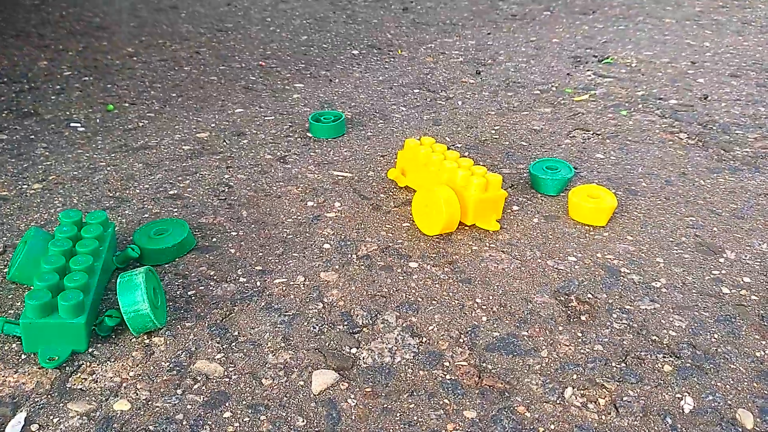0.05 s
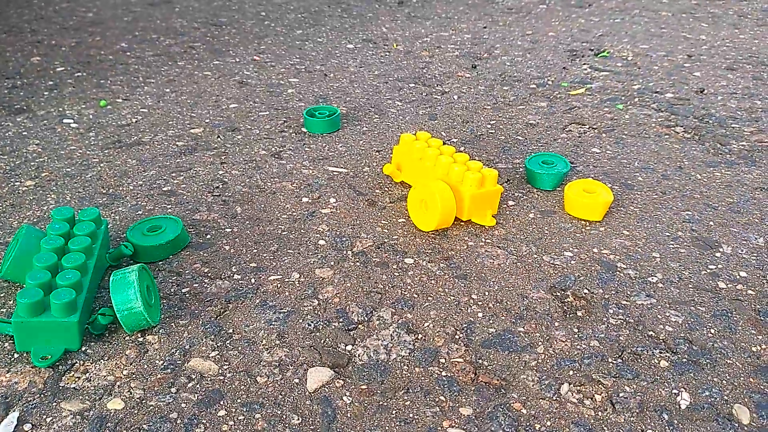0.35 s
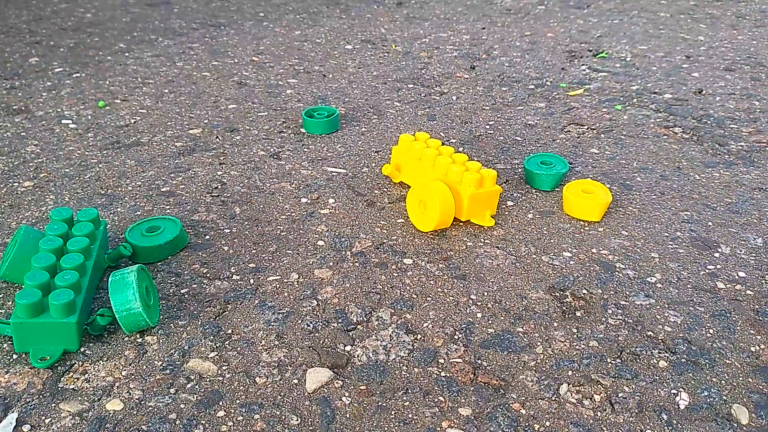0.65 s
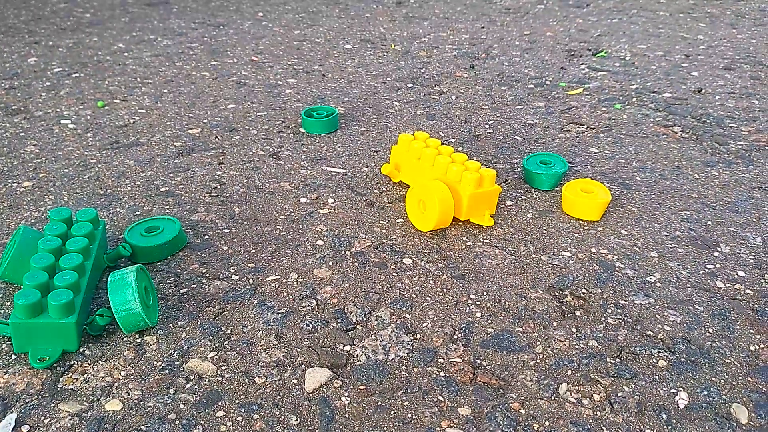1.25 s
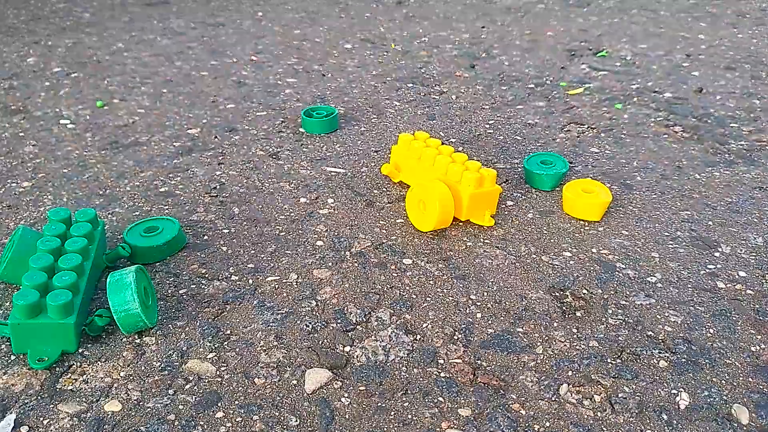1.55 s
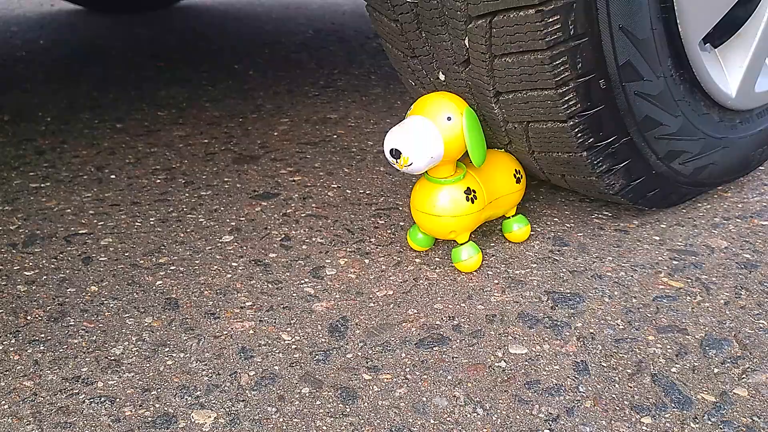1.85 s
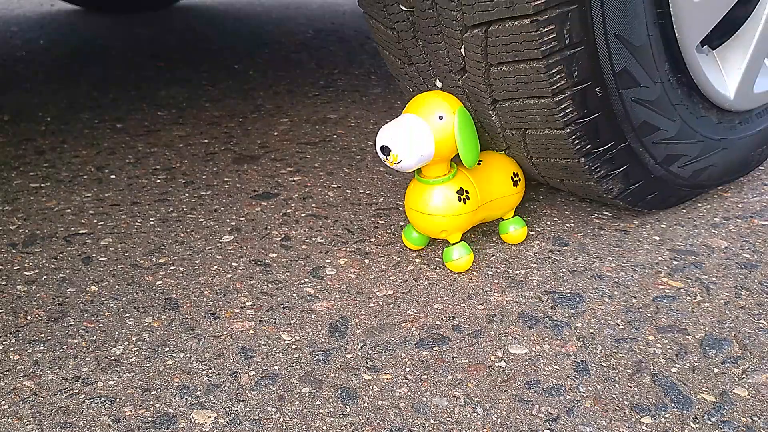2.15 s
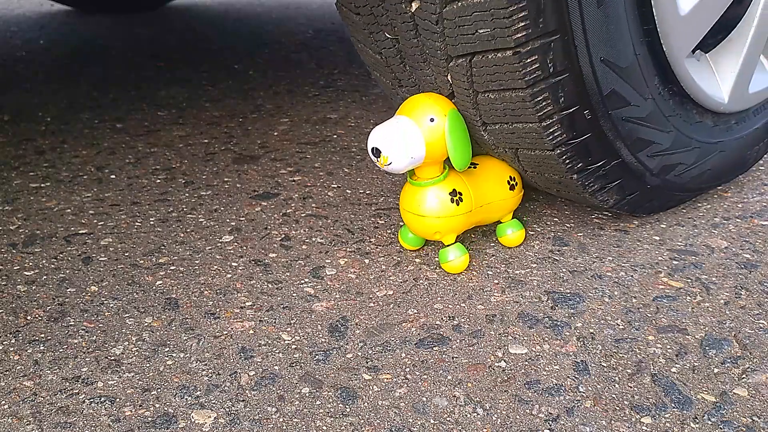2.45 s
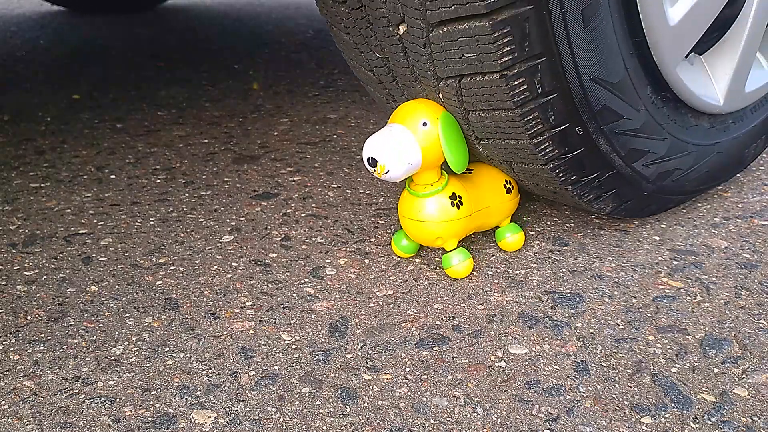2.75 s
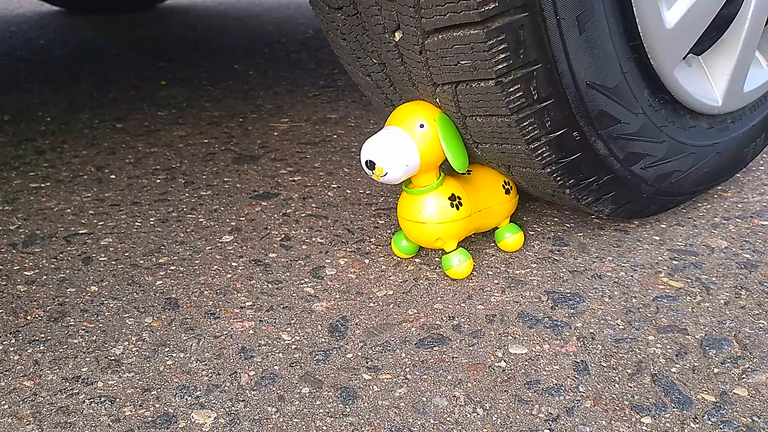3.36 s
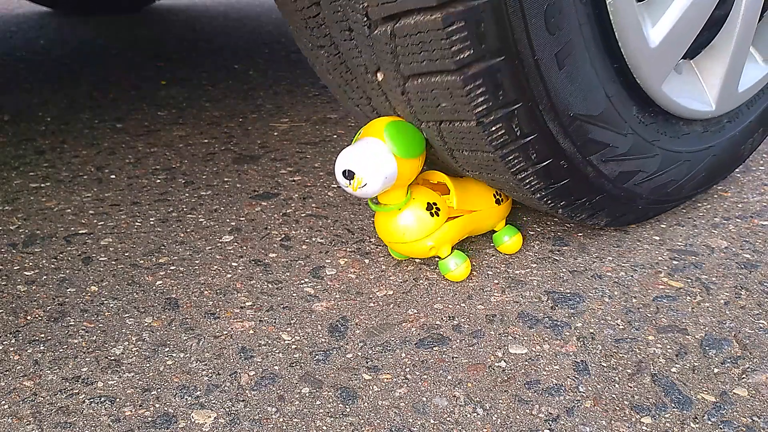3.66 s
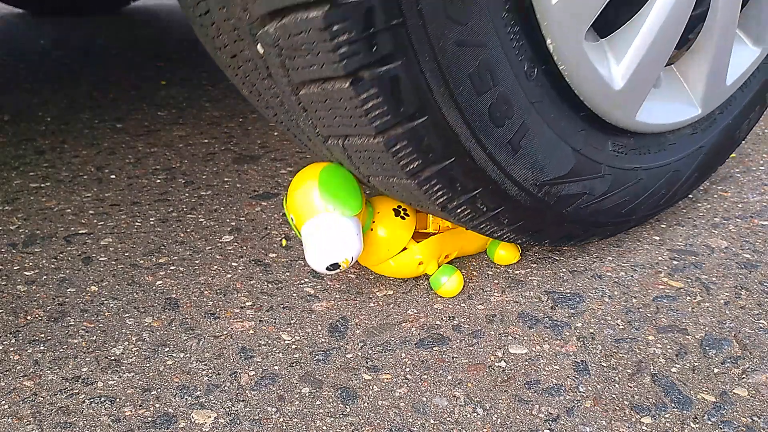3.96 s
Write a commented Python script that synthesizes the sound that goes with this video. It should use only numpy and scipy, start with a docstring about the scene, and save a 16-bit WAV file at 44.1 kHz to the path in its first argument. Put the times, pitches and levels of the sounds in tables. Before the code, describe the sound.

A plastic toy cracks and crunches under a car tyre on asphalt. The engine first idles a little way off, then close. Single sharp snaps come, then the engine revs and loud splintering with low thumps overloads the microphone.

```python
"""Car crushing a plastic toy

A car idles on asphalt, first a little way off, then close. It revs and its tyre climbs onto a
hollow plastic toy: single fractures snap, then runs of splintering crunch as the shell caves in.
The collapsing shell pushes air in low thumps; the loudest breaks overload the microphone."""
import sys
import numpy as np
from scipy import signal
from scipy.fft import rfft, irfft
from scipy.io import wavfile

SR = 44100
rng = np.random.default_rng(int(sys.argv[2]) if len(sys.argv) > 2 else 0)


def bounce(signal):
    """Save signal as a 16-bit WAV file at the path given by the first command-line argument."""
    frames = np.transpose(np.atleast_2d(signal))
    limited = np.clip(frames, -1, 1)
    pcm = np.round(limited * 32767).astype(np.int16)
    wavfile.write(sys.argv[1], SR, pcm)


N = 176400
CLOSE_S = 1.715  # the car is close from here on
SPLINTER_T60_S = 0.0053

# runs of splintering: t/s, length/s, rel. level/dB, rel. thump/dB, wall ring f/Hz, rel. ring/dB
CRUNCH_RUNS = [(2.5, 0.022, -9.5, -8.5, 1080, -13), (3.486, 0.026, -9, -16, 1520, -18),
               (3.5545, 0.023, -12.5, -6, 940, -5.5), (3.589, 0.0124, -13, -22, 1590, -6),
               (3.604, 0.019, -10, -9.5, 2270, -2), (3.629, 0.019, -16, -5.5, 650, -9.5),
               (3.690, 0.026, -19, -11, 930, -10), (3.709, 0.022, -10, -12.5, 2720, -14),
               (3.732, 0.028, -10.5, -14, 1008, -16), (3.804, 0.012, -17, -18, 1460, -11),
               (3.857, 0.024, -10, -12, 510, -8.5), (3.969, 0.015, -9.5, -2, 1480, -3),
               (3.987, 0.018, -11.5, -8, 1980, -4)]


def undb(db):
    """Decibels to amplitude."""
    return 10 ** (np.asarray(db) / 20)


def unit(x):
    """Scale to rms 1."""
    return x / np.sqrt(np.mean(x ** 2) + 1e-18)


def curve(rows, column=1):
    """One table column, linear in time between rows."""
    rows = np.array(rows)
    return np.interp(np.arange(N) / SR, rows[:, 0], rows[:, column])


def on_log(points, hz):
    """Read (f/Hz, value) points on a log-frequency axis."""
    points = np.array(points)
    return np.interp(np.log(hz + 1e-3), np.log(points[:, 0]), points[:, 1])


def colour(x, spectrum):
    """Minimum-phase filter of unit power, falling away below the spectrum's lowest point."""
    size = 2 ** 18
    hz = np.arange(size // 2 + 1) * SR / size
    low_cut = np.clip(hz / spectrum[0][0], 1e-2, 1) ** 3
    gain = unit(undb(on_log(spectrum, hz)) * low_cut)
    cepstrum = irfft(np.log(gain))
    cepstrum[1:size // 2] *= 2
    cepstrum[size // 2 + 1:] = 0
    return irfft(rfft(x, size) * np.exp(rfft(cepstrum)))[..., :x.shape[-1]]


def band(x, hz, width_hz):
    """A resonance applied twice."""
    b, a = signal.iirpeak(hz, hz / width_hz, fs=SR)
    return signal.lfilter(b, a, signal.lfilter(b, a, x))


def decay(t, t60_s):
    """Exponential fall of 60 dB in t60_s."""
    return np.exp(-np.log(1000) * t / t60_s)


def add(out, start_s, x):
    """Mix x into out from start_s."""
    i = int(start_s * SR)
    out[:, i:i + x.shape[-1]] += x[..., :max(N - i, 0)]


def uneven_sizes(count, spread_db=4.5):
    """Random amplitudes, many small and a few large."""
    return undb(spread_db * np.minimum(rng.exponential(size=count), 4))


def stereo_noise():
    """White noise, partly alike left and right in the bass."""
    # stereo likeness: f/Hz, left-right correlation
    likeness = [(20, 0.67), (120, 0.32), (300, 0.7), (600, 0.011), (15000, 0.034)]
    correlation = on_log(likeness, np.arange(N // 2 + 1) * SR / N)
    mid, side = rfft(rng.standard_normal((2, N)))
    spectrum = mid * np.sqrt(1 + correlation) + side * np.sqrt(1 - correlation) * np.array([[1], [-1]])
    return unit(irfft(spectrum, N))


def smear(x, t60_s):
    """Scattered reflections: each click becomes a noise tail of equal energy."""
    pole = decay(1 / SR, t60_s) ** 2
    power = signal.lfilter([1 - pole], [1, -pole], np.mean(x ** 2, axis=0) + 1e-18)
    return np.sqrt(power) * rng.standard_normal((2, N))


def under_car(x):
    """Direct sound, quick scatter between road, tyre and underbody, and a faint late echo."""
    return x + undb(-1) * smear(x, t60_s=0.092) + undb(-20.5) * smear(x, t60_s=0.38)


def engine_bay():
    """Hiss and hum of the engine bay with street noise, far and then near."""
    # noise spectra: f/Hz, rel. density/dB
    far_spectrum = [(100, 3), (200, -11.5), (320, -16.5), (520, -11), (700, -18), (950, -28), (1350, -25.5),
                    (1650, -21), (2100, -24.5), (3200, -32.5), (4300, -30.5), (7400, -38.5), (9700, -33.5),
                    (11000, -45.5), (15000, -70)]
    near_spectrum = [(100, -4.5), (170, -5), (300, -12.5), (520, -5), (760, -12), (1050, -19.5),
                     (1950, -15), (3300, -25), (4400, -24), (7000, -32.5), (8800, -28.5), (9800, -32),
                     (11000, -43.5), (15000, -52)]
    # noise envelopes: t/s, level/dB
    far_level = [(0, -38.5), (.45, -39), (.9, -42), (1.7, -41.5)]
    near_level = [(1.7, -36), (2.3, -37.5), (2.7, -36.5), (3.1, -37.5), (3.3, -33.5), (3.48, -27), (4, -22)]
    # bay hums: f/Hz, width/Hz, far level/dB, near level/dB
    hums = [(225.7, 17.6, -55, -49), (417.5, 29.6, -44, -45), (623.4, 48, -51.5, -41)]
    close = np.arange(N) / SR > CLOSE_S
    near = undb(curve(near_level)) * unit(colour(stereo_noise(), near_spectrum))
    far = undb(curve(far_level)) * unit(colour(stereo_noise(), far_spectrum))
    bay = np.where(close, near, far)
    for hz, width_hz, far_db, near_db in hums:
        bay += undb(np.where(close, near_db, far_db)) * unit(band(stereo_noise(), hz, width_hz))
    return bay


def engine():
    """Exhaust harmonics of the firing rate; the bay noise throbs with each firing."""
    # exhaust: t/s, firing rate/Hz, level/dB of harmonics 1, 2, 3, 4 before panning
    idle_far = [(0.0, 29, -20, -43, -45, -26.5), (0.022, 29.15, -23.5, -30.5, -52, -27),
                (0.476, 28.9, -25, -24.5, -58, -28.5), (0.556, 28.93, -26, -29.5, -44, -29),
                (1.68, 28.9, -28, -33, -51, -32)]
    idle_near = [(1.76, 29.02, -31, -24, -31, -28.5), (1.788, 29.2, -27.5, -28, -40, -26.5),
                 (2.3, 29.17, -23.5, -22.5, -40, -26.5)]
    revving = [(2.66, 29.67, -24.5, -24, -31.5, -27), (2.82, 29.73, -25.5, -26, -52, -26.5),
               (2.968, 31.74, -22, -33, -59, -36.5), (3.144, 34.11, -19, -24.5, -58, -45),
               (3.29, 39.1, -17.5, -28.5, -19, -44), (3.372, 47.15, -20, -28.5, -47, -39),
               (3.458, 54.8, -20.5, -26, -29, -57), (3.522, 58.9, -16.5, -24, -23, -43),
               (3.578, 61.53, -14, -25.5, -44, -47), (3.88, 69.24, -21.5, -30, -63, -51),
               (3.924, 69.8, -21, -47, -50, -36), (4.0, 70.8, -12, -30, -38, -26)]
    left_lag_s, harmonic_lag_rad, pan_db, throb_db = 0.00038, 0.7, 5, 1
    rows = [*idle_far, *idle_near, *revving]
    firing_hz = curve(rows)
    phase = 2 * np.pi * (np.cumsum(firing_hz) / SR - np.array([[left_lag_s], [0]]) * firing_hz)
    exhaust = np.zeros((2, N))
    for k in range(1, 5):
        peak = np.sqrt(2) * undb(curve(rows, column=k + 1))
        exhaust += peak * np.cos(k * phase - harmonic_lag_rad * (k - 1))
    pan = undb([[pan_db / 2], [-pan_db / 2]])
    return exhaust * pan + engine_bay() * undb(throb_db * np.cos(phase))


def tyre():
    """Rumble that grows as the wheel rolls over the toy."""
    # rumble envelope: t/s, level/dB
    level = [(0, -26.5), (.4, -34.5), (.6, -35), (1.65, -37), (1.8, -33), (3.25, -30.5), (3.4, -24),
             (3.55, -20), (3.76, -11), (3.9, -22.5), (4, -15)]
    # rumble spectrum: f/Hz, rel. density/dB
    spectrum = [(10, 9), (25, 4), (60, 6.5), (130, 0.5), (250, -22), (600, -48), (3000, -63), (12000, -75)]
    return undb(curve(level)) * unit(colour(stereo_noise(), spectrum))


def grit():
    """Grains of asphalt pop under the nearby tread."""
    # pop spectrum: f/Hz, rel. density/dB
    spectrum = [(400, -9), (1000, -1), (2000, -3), (4000, -19), (9000, -13), (11000, -43), (15000, -58)]
    pops_per_s, level_db = 60, -54.5
    hits = (rng.random(N) < pops_per_s / SR) & (np.arange(N) / SR > CLOSE_S)
    impulses = hits * uneven_sizes(N)
    pops = smear(impulses[None], SPLINTER_T60_S)
    return undb(level_db) * unit(colour(under_car(pops), spectrum))


def click():
    """One dry, dull click where the scene changes to close by."""
    level_db, decay_s = -15, 0.00071
    age_s = np.arange(N) / SR - CLOSE_S
    return undb(level_db) * (age_s > 0) * np.exp(-np.abs(age_s) / decay_s)


def scuffs():
    """Brief rubs and ticks, each one swell of friction in its own band."""
    # rubs: t/s, length/s, rel. level/dB, low edge/Hz, high edge/Hz
    rubs = [(0, 0.062, -39, 4660, 10500), (0.052, 0.017, -38, 300, 1130), (0.146, 0.014, -43, 5630, 6000),
            (0.275, 0.023, -36, 316, 1100), (0.266, 0.057, -47, 4500, 10100),
            (0.377, 0.049, -48.5, 4600, 10100), (1.364, 0.043, -46, 3500, 13000),
            (1.371, 0.057, -32.5, 1888, 3500), (1.372, 0.082, -33.5, 850, 2300),
            (2.677, 0.097, -32.5, 1300, 3230)]
    out = np.zeros((2, N))
    t = np.arange(SR // 4) / SR
    for start_s, length_s, db, low_hz, high_hz in rubs:
        age = 2 * t / length_s
        swell = 2 * age * np.exp(-age ** 2)
        bandpass = signal.butter(3, [low_hz, high_hz], "bandpass", fs=SR, output="sos")
        friction = unit(signal.sosfilt(bandpass, rng.standard_normal((2, len(t)))))
        add(out, start_s, undb(db) * swell * friction)
    return out


def booms():
    """Dull knocks and the tyre booming as it drops: low tones that fall as the contact relaxes."""
    # impacts: t/s, rel. level/dB, first f/Hz, settled f/Hz, t60/s
    impacts = [(.053, -17, 380, 130, .06), (.273, -18, 370, 120, .06), (2.495, -13, 175, 155, .15),
               (2.518, -21, 250, 226, .32), (2.527, -15, 190, 132, .16), (3.699, -10, 210, 90, .05),
               (3.798, -10, 250, 140, .045), (3.7585, -1, 155, 122, .085), (3.757, -6, 72, 72, .2)]
    rise_s, settle_s = 0.0025, 0.011
    out = np.zeros((2, N))
    t = np.arange(SR // 2) / SR
    for start_s, db, first_hz, settled_hz, t60_s in impacts:
        hz = settled_hz + (first_hz - settled_hz) * np.exp(-t / settle_s)
        swell = (1 - np.exp(-t / rise_s)) * decay(t, t60_s)
        add(out, start_s, undb(db) * swell * np.sin(2 * np.pi * np.cumsum(hz) / SR))
    return out


def thumps():
    """Each collapse sends a sudden push or pull of air to the microphone, then low buffeting."""
    # shell giving way: t/s, rel. level/dB
    collapses = [(2.366, -33), (2.481, -2), (2.986, -17), (3.397, -7), (3.801, -6.5)]
    # buffeting spectrum: f/Hz, rel. density/dB
    spectrum = [(8, 2), (22, 1), (50, -8.5), (160, -14), (300, -31.5), (700, -61), (5000, -95)]
    surge_rise_s, surge_fall_s, surge_imbalance = 0.0021, 0.015, 0.48
    buffet_s, buffet_db = 0.042, -8.5
    envelope, surges = np.zeros((2, 2, N))
    t = np.arange(SR // 3) / SR
    surge = (1 - np.exp(-t / surge_rise_s)) * np.exp(-t / surge_fall_s)
    swell = (1 - np.exp(-20 * t / buffet_s)) * np.exp(-(t / buffet_s) ** 2 / 2)
    run_thumps = [(start_s, db) for start_s, _, _, db, *_ in CRUNCH_RUNS]
    for k, (start_s, db) in enumerate(sorted([*collapses, *run_thumps], key=lambda row: row[0])):
        pan = 1 + surge_imbalance * rng.choice([-1, 1]) * np.array([[1], [-1]])
        add(surges, start_s, (-1) ** k * undb(db) * surge * pan)
        add(envelope, start_s, undb(db) * swell)
    buffeting = unit(colour(rng.standard_normal((2, N)), spectrum))
    return surges + undb(buffet_db) * envelope * buffeting


def shards():
    """Pieces freed in each run of splintering ring briefly, each at its own pitch."""
    shards_per_s, low_hz, high_hz, t60_s, gain_db = 650, 1110, 7065, 0.052, -10.5
    out = np.zeros((2, N))
    t = np.arange(SR // 8) / SR
    for start_s, length_s, db, *_ in CRUNCH_RUNS:
        draws = rng.random((64, 4))
        for when, pitch, turn, size in draws[:int(shards_per_s * length_s)]:
            hz = low_hz * (high_hz / low_hz) ** pitch
            stereo_cycles = np.array([[0], [turn - .5]])
            ring = np.sin(2 * np.pi * (hz * t + stereo_cycles)) * decay(t, t60_s)
            add(out, start_s + when * length_s, undb(db + gain_db) * 2 * size * ring)
    return out


def snaps():
    """Each fracture is a spike and a short tearing burst with a duller body; the freed piece rings."""
    # single breaks: t/s, rel. level/dB, ring f/Hz, ring re tear/dB, body re tear/dB, ring t60/s
    fractures = [(.466, -38.5, 2100, 14.5, -13, 0.08), (.486, -45, 2260, 16, -10, 0.024),
                 (2.180, -30.5, 2210, 2, -8, 0.043), (2.235, -36.5, 1560, 0, 19, .04),
                 (2.252, -37, 1560, 16, 14, 0.038), (2.324, -17, 3900, 3, 4.5, 0.015),
                 (2.367, -4.5, 8600, -5, -5.5, 0.028), (2.368, -22.5, 1100, 7, 5, 0.025),
                 (2.373, -20, 4000, 15.5, -19, 0.034), (2.4809, -1, 3500, -0.5, 1, 0.012),
                 (2.607, -17.5, 4636, 9, -25, 0.014), (2.653, -10.5, 6090, -12, -15, 0.016),
                 (2.713, -16.5, 3860, -2, -11, 0.065), (2.746, -23.5, 1530, -12, 3.5, .03),
                 (2.902, -17, 4480, 9.5, -17, 0.096), (2.9861, 1, 3080, -7.5, -9, 0.025),
                 (3.1682, -19.5, 5340, 0, -26, 0.031), (3.3431, -2, 2755, 10, -3, 0.018),
                 (3.345, -11.5, 4440, 9.5, -2, 0.062), (3.345, -21, 5860, 8, 1, 0.071),
                 (3.397, 1, 3410, -21, -6, .05), (3.5444, -13, 6000, -14, 1.5, .04),
                 (3.583, -8, 2010, 2, -7, .04), (3.6429, 3, 1880, -5, -5.5, 0.025),
                 (3.6998, -2, 2345, -14, 5, 0.052), (3.802, 1.5, 3980, -14, -2, 0.037),
                 (3.8431, -1, 2770, -14, -1.5, 0.052), (3.9237, -6.5, 2685, -12, -6, .04),
                 (3.9456, -4.5, 2001, -4, -7, 0.15)]
    # bright crack and dull body spectra: f/Hz, rel. density/dB
    crack_spectrum = [(400, -8.5), (1200, -8), (2800, 1.5), (4500, 1.5), (7000, -2), (9000, 2), (10300, -7),
                      (12000, -18), (15500, -27)]
    body_spectrum = [(150, 0.5), (400, -3.5), (1100, -4.5), (2200, -7.5), (4000, -16.5), (10000, -45)]
    gain_db, spike_db, tear_s = -3, 9, 0.0014
    cracks, bodies, rings = np.zeros((3, 2, N))
    t = np.arange(SR // 8) / SR
    for start_s, db, ring_hz, ring_db, body_db, t60_s in fractures:
        crack_noise, body_noise, ring_noise = rng.standard_normal((3, 2, len(t)))
        crack_noise[:, 0] = body_noise[:, 0] = -undb(spike_db)
        tear = undb(db) * np.exp(-t / tear_s)
        tear_rms = np.sqrt(np.mean(tear ** 2))
        ring = band(ring_noise, ring_hz, width_hz=1100) * decay(t, t60_s)
        add(cracks, start_s, tear * crack_noise)
        add(bodies, start_s, undb(body_db) * tear * body_noise)
        add(rings, start_s, undb(ring_db) * tear_rms * unit(ring))
    bright = colour(under_car(cracks), crack_spectrum)
    dull = colour(under_car(bodies), body_spectrum)
    return undb(gain_db) * (bright + dull + rings)


def crunches():
    """Runs of tiny, uneven fractures: each run opens with a crack and rings one wall of the shell."""
    # splintering spectrum: f/Hz, rel. density/dB
    spectrum = [(80, -8.5), (200, 4.5), (500, 1), (1000, -2.5), (1700, -2.5), (3000, -1.5), (5000, -3.5),
                (7000, -9.5), (9000, -2.5), (10300, -11.5), (12000, -18.5), (15500, -24.5)]
    splinters_per_s, fade_db = 1000, 5
    opening_db, opening_s = 4.5, 0.0025
    breaks, walls = np.zeros((2, 2, N))
    t = np.arange(SR // 8) / SR
    for start_s, length_s, db, _, ring_hz, ring_db in CRUNCH_RUNS:
        hits = rng.random(len(t)) < splinters_per_s / SR
        splinters = hits * uneven_sizes(len(t))
        run = (splinters * undb(-fade_db * t / length_s))[:int(length_s * SR)]
        add(breaks, start_s, undb(db) * unit(run))
        add(breaks, start_s, undb(db + opening_db) * np.exp(-t / opening_s))
        kicks = splinters * (t < length_s) * rng.standard_normal((2, len(t)))
        ring = band(kicks, ring_hz, width_hz=270)
        add(walls, start_s, undb(db + ring_db) * unit(ring) * np.sqrt(length_s / t[-1]))
    return colour(under_car(smear(breaks, SPLINTER_T60_S)), spectrum) + walls


def scene():
    """The car and the breaking toy, in stereo."""
    car = engine() + tyre() + grit()
    toy = snaps() + crunches() + shards() + thumps()
    return car + toy + booms() + scuffs() + click()


def record(dry):
    """The microphone overloads on the loudest breaks; the top is cut."""
    knee, top_hz = 3.2, 15750
    clipped = dry / (1 + np.abs(dry) ** knee) ** (1 / knee)
    return signal.sosfilt(signal.ellip(10, .1, 70, top_hz, fs=SR, output="sos"), clipped)


dry = scene()
out = record(dry)
bounce(out)
```